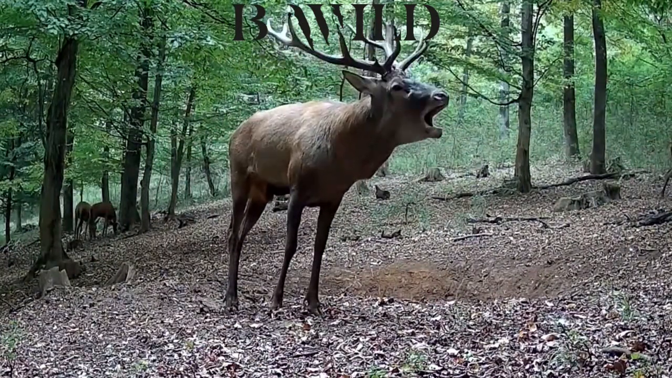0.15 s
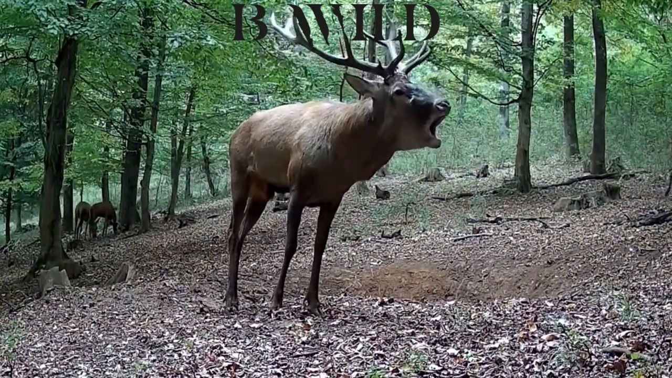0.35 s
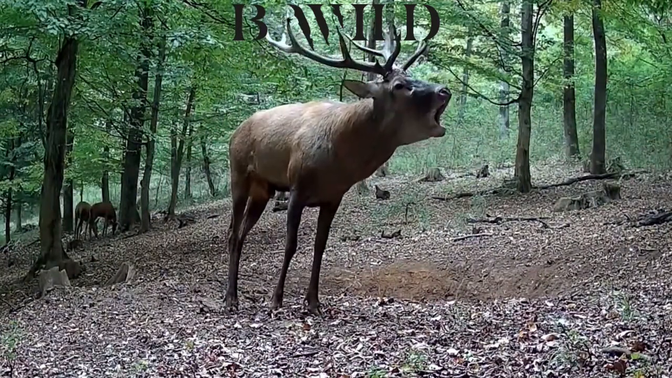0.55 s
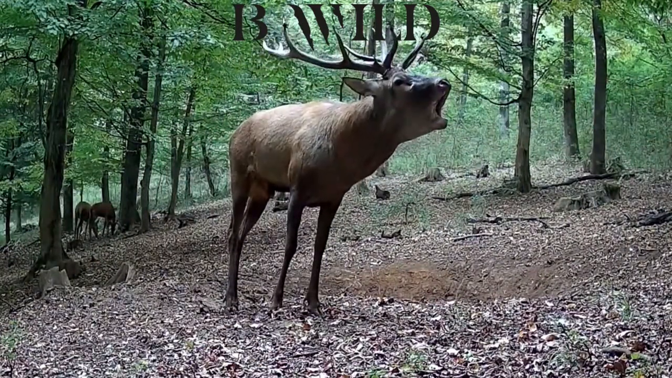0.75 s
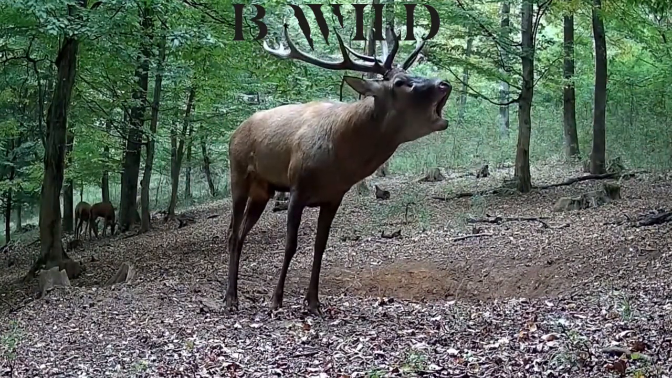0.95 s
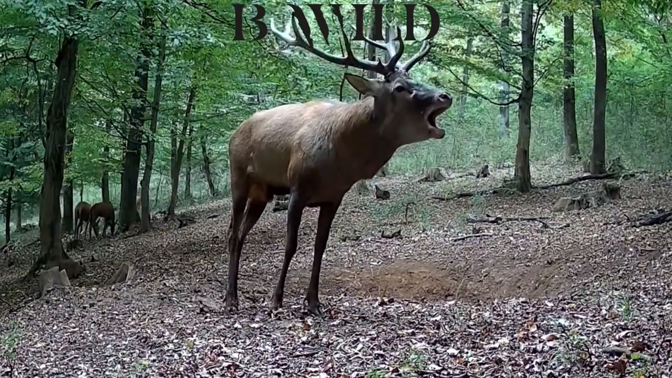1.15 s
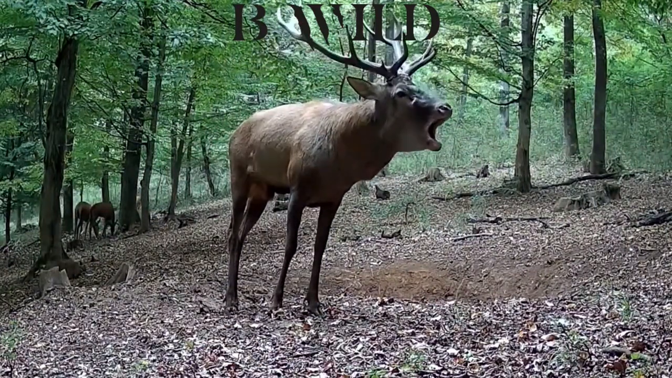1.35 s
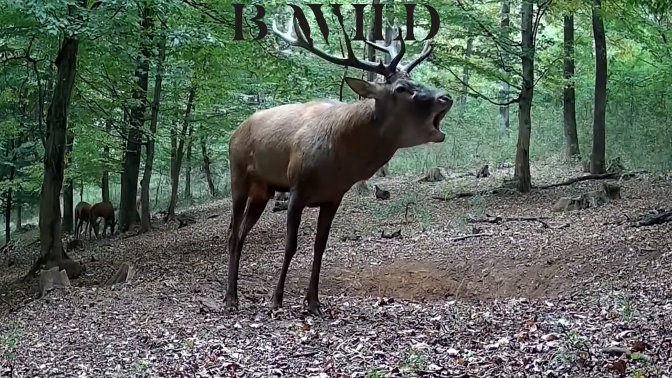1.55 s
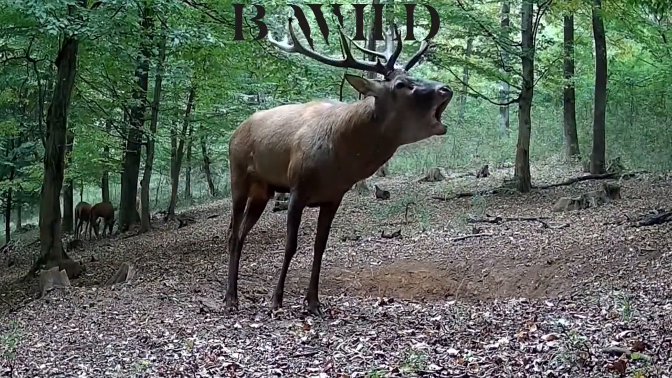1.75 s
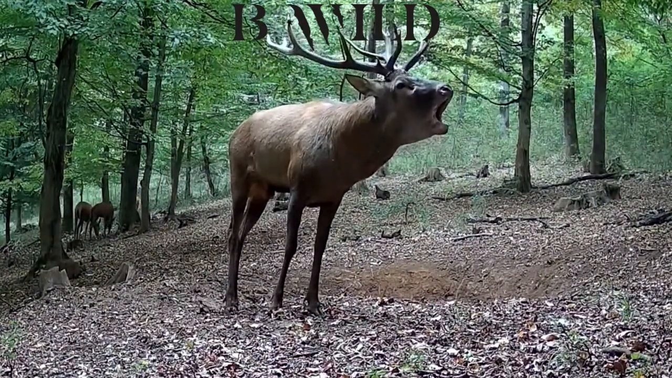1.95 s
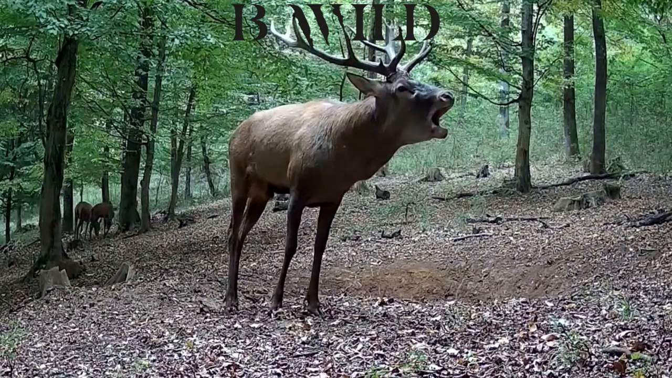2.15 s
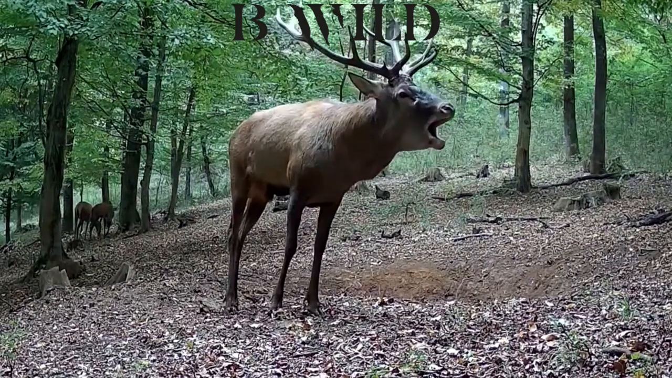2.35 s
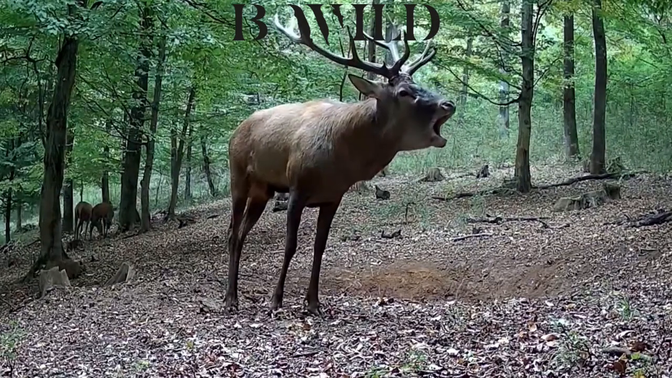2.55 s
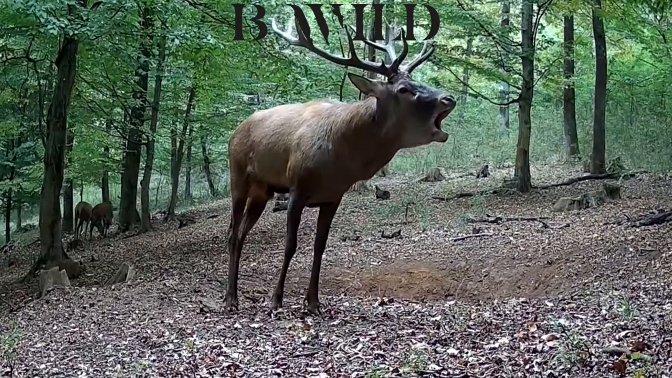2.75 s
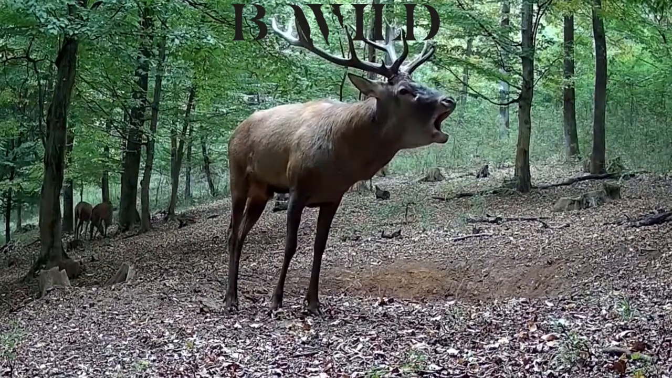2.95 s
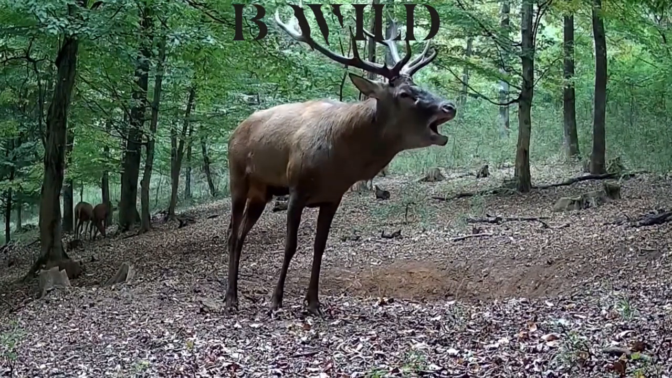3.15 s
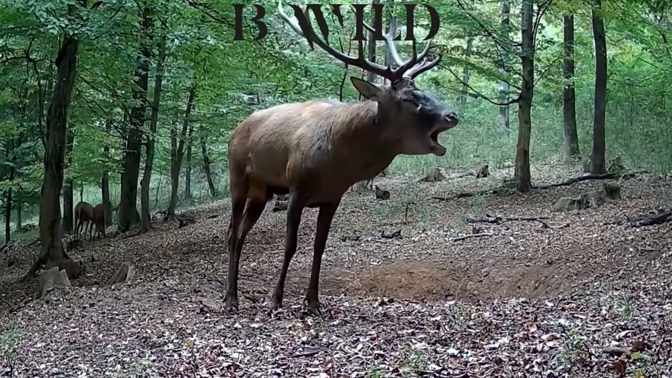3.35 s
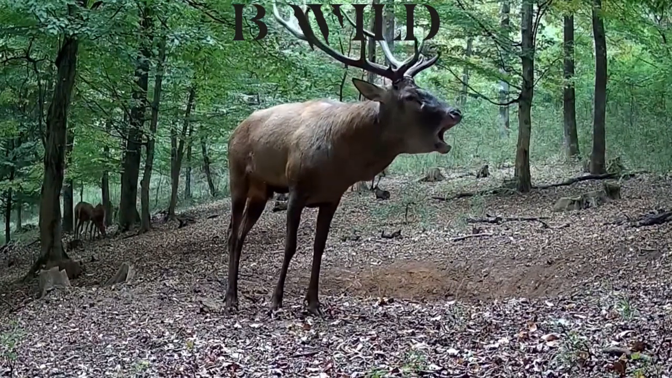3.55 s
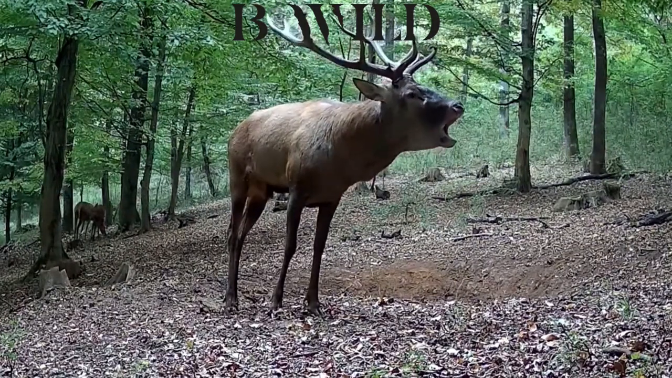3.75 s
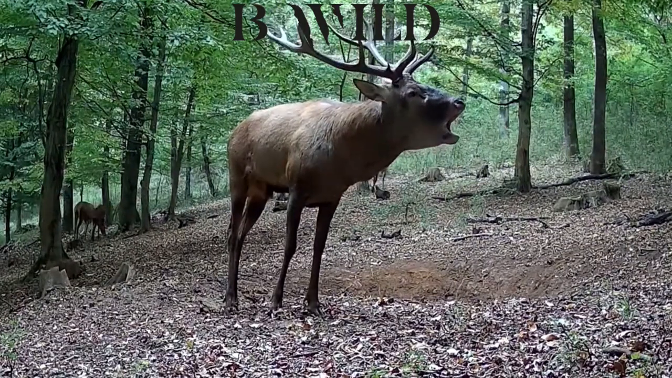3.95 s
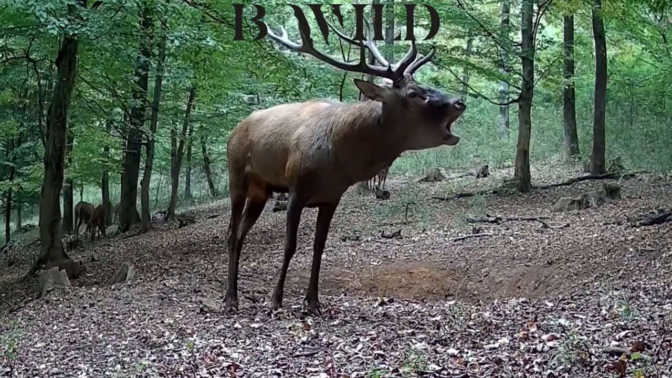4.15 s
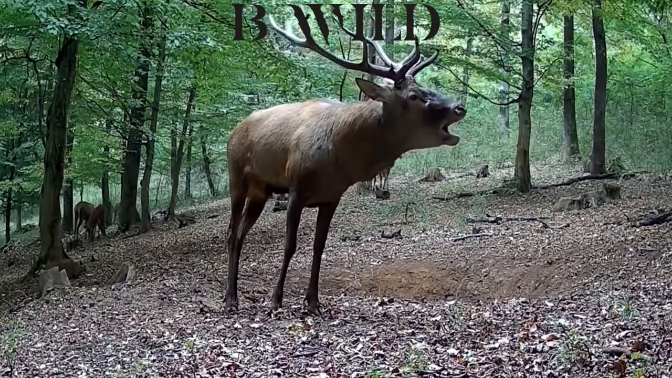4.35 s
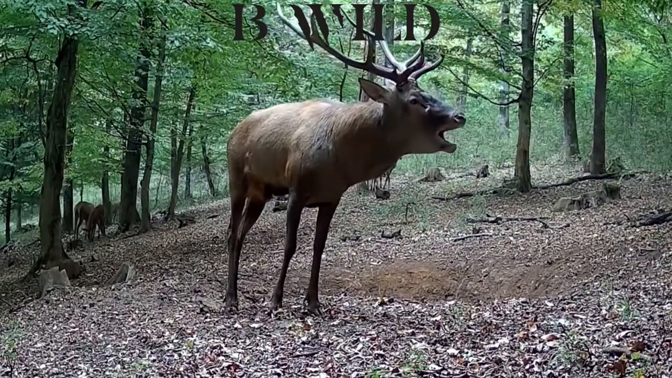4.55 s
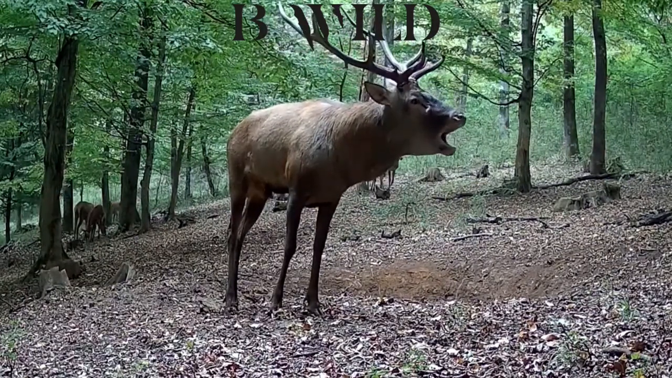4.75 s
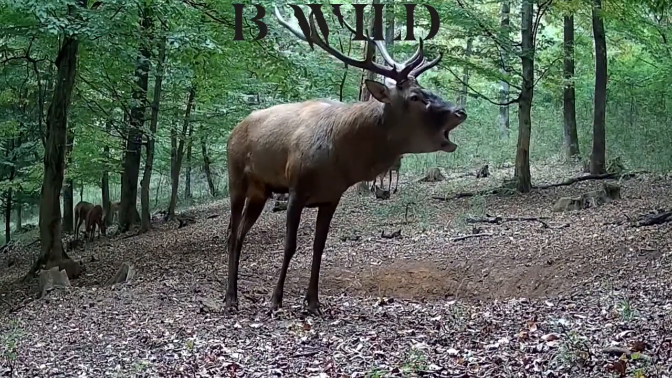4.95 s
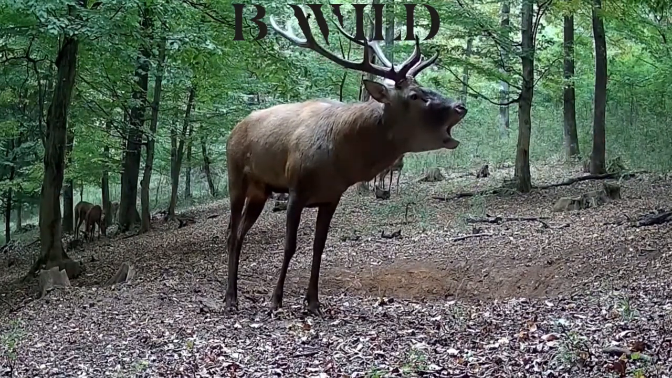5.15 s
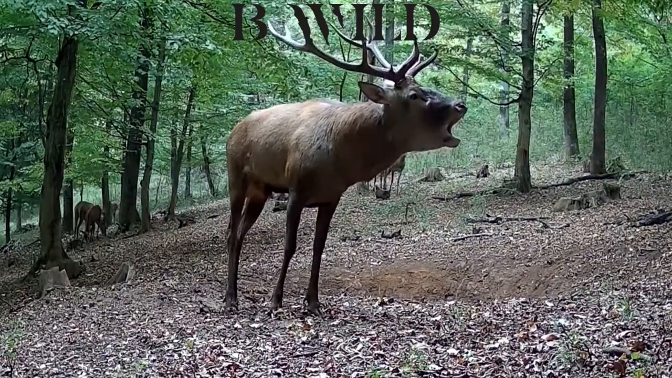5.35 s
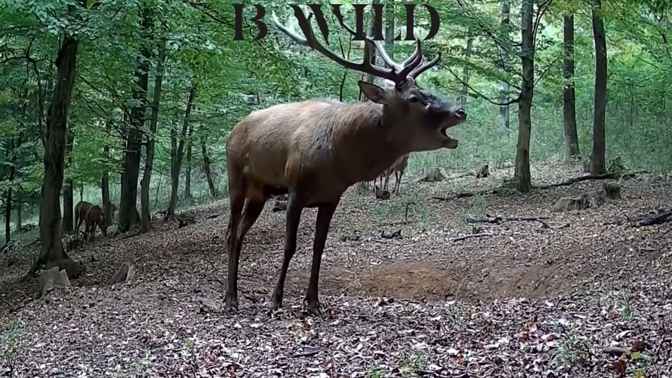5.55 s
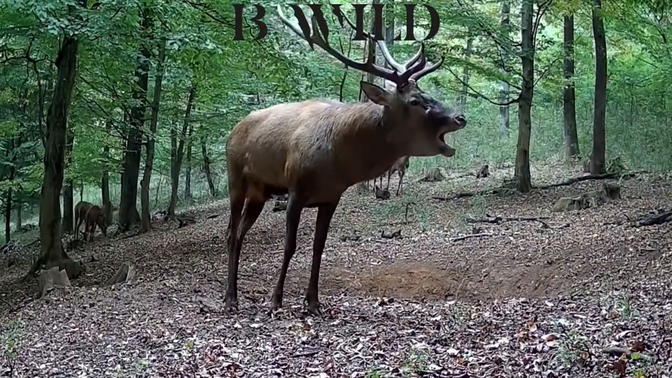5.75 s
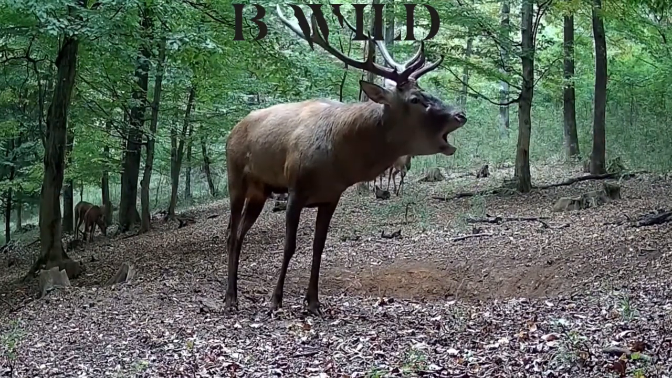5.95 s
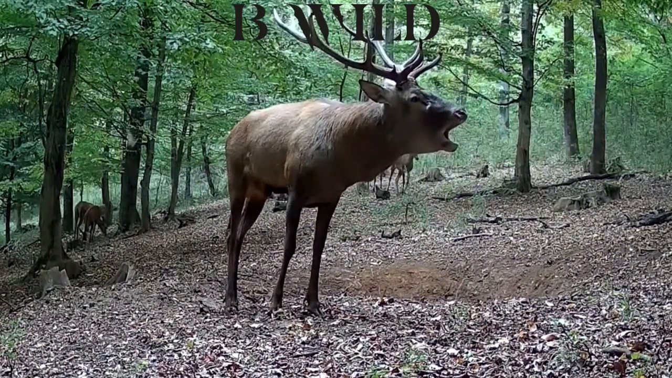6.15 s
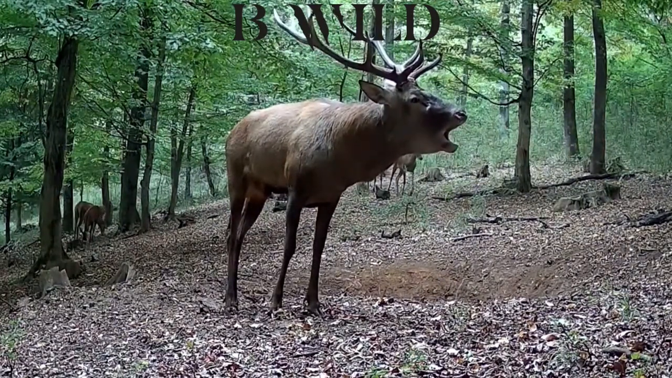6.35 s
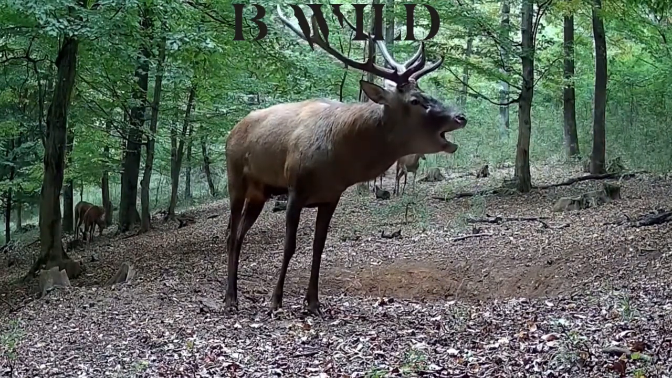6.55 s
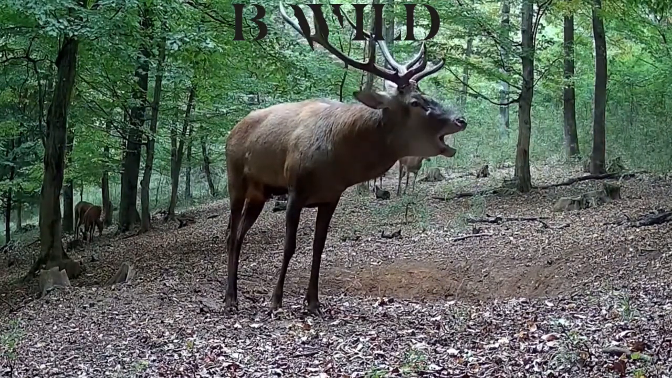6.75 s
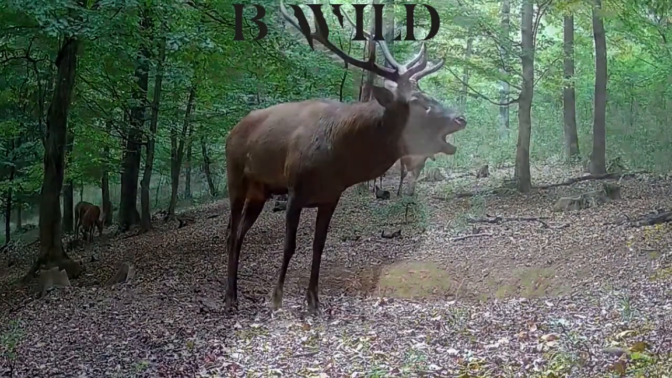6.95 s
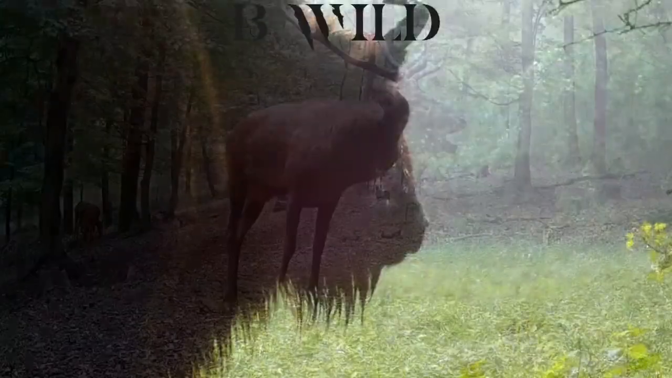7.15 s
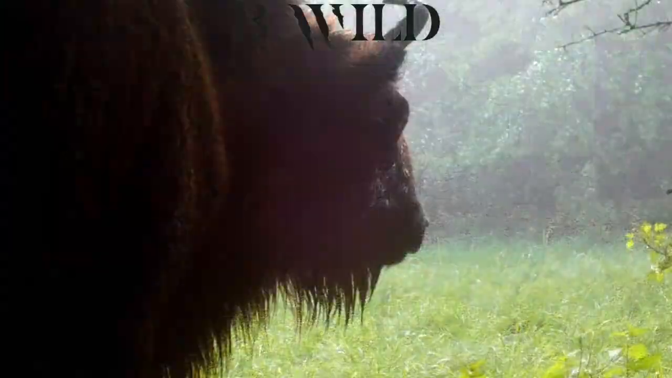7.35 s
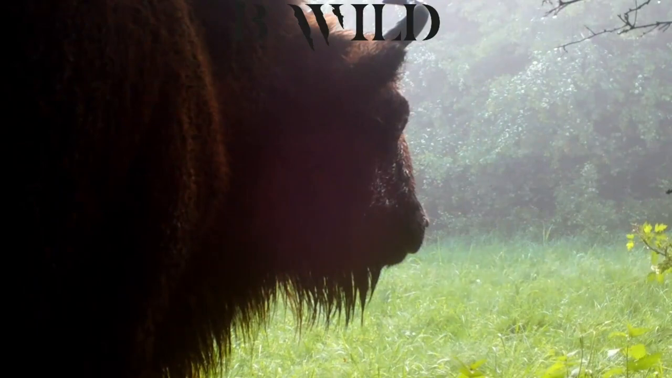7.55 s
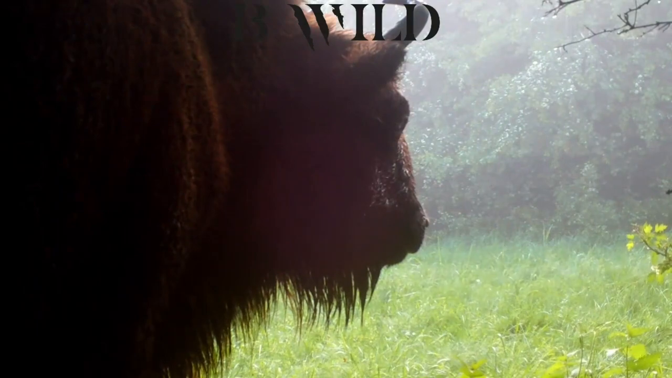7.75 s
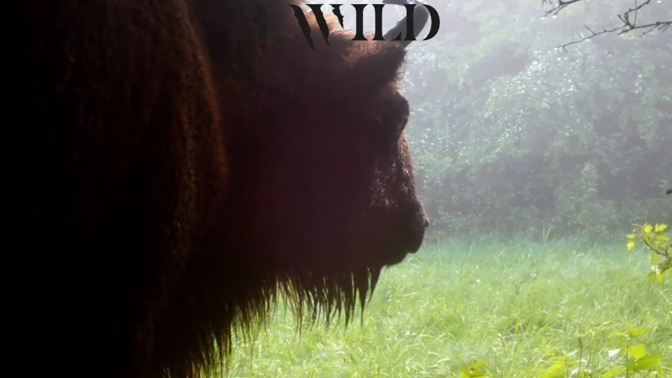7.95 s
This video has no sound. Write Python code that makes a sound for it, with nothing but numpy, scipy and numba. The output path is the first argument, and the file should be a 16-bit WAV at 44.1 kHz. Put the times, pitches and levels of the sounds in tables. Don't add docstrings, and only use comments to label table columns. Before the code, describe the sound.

A red deer stag close by bellows six hoarse, guttural roars in woodland, gradually weakening to a faint creak, then hissing meadow air with bird whistles.

```python
import sys
import numpy as np
from scipy import signal
from scipy.fft import rfft, irfft, next_fast_len
from scipy.io import wavfile
from scipy.ndimage import uniform_filter1d, minimum_filter1d, map_coordinates
from numba import njit

SR = 44100
rng = np.random.default_rng(int(sys.argv[2]) if len(sys.argv) > 2 else 0)


def waveform_to_disk(signal):
    frames = np.transpose(np.atleast_2d(signal))
    scaled = np.clip(frames, -1, 1) * 32767
    samples = np.round(scaled).astype(np.int16)
    wavfile.write(sys.argv[1], SR, samples)


def rack_gain(trim_db):
    fader = np.asarray(trim_db, float)
    return 10 ** (fader / 20)


N = 356769
STEP = 32

# time_s, pulse_rate_hz, effort_db, mouth_opening_db
TAIL = [(0.0, 56, -24, -0.5), (0.082, 51.5, -52, -17), (0.1, 51.7, -49, -13.5)]
FIRST = [(0.289, 83, -60, -7), (0.362, 101.3, -22.5, -10.5), (0.4, 107.8, -20, -1), (0.5, 115.6, -5, -11),
         (0.566, 120.4, -11, -8), (0.874, 115.5, -8, -13), (0.949, 107.8, -10.5, -7.5),
         (1.002, 86.42, -14, -10), (1.07, 52.6, -47.5, -3)]
SECOND = [(1.312, 74.74, -60, -8), (1.372, 100.8, -22, -7.5), (1.492, 106.5, -14, 2.5),
          (1.596, 105.7, -14.5, -2), (1.705, 90.9, -11, -4), (1.958, 87.93, -7.5, -12.5),
          (2.026, 82.26, -14, -5.5), (2.07, 66.24, -14, -6.5), (2.159, 48.56, -57, 0.5)]
THIRD = [(2.39, 74.03, -51.5, -6.5), (2.494, 95.04, -25, 3), (2.604, 99.74, -14.5, -5),
         (2.699, 88.7, -17, 0), (2.8, 73.97, -19.5, 0), (2.954, 64.43, -18.5, 0.5), (3.0, 56.18, -14.5, -4),
         (3.044, 49.2, -39, 8), (3.12, 43.23, -51, -14)]
FOURTH = [(3.37, 66.4, -53.5, -4.5), (3.47, 83.3, -31.5, 0.8), (3.598, 92, -23, -2),
          (3.696, 91.64, -16.5, 2.5), (3.802, 92.43, -4.5, -9.5), (4.041, 81.58, -14.5, 0),
          (4.265, 67.04, -9.5, -13), (4.305, 57.17, -35, 9), (4.4, 41.6, -56.5, -6)]
FIFTH = [(4.66, 66.73, -87, 4), (4.692, 73.5, -51, -1.5), (4.779, 82.28, -39, 1.2),
         (4.902, 87.8, -24.5, -2.5), (4.97, 87.83, -22.5, 3.5), (5.296, 82.68, -16.5, 0.6),
         (5.38, 72.12, -14.5, -5), (5.44, 52, -25.5, -1.5), (5.502, 44.7, -63.5, 6.7)]
SIXTH = [(5.8, 64, -73, 6), (5.842, 67.2, -45.5, -3), (5.936, 83.1, -38, 2), (6.028, 85, -23, -2),
         (6.126, 78.6, -25, 2.5), (6.344, 59.9, -21.5, -2.1), (6.378, 54.77, -23, -2),
         (6.424, 46.28, -37, 4.5), (6.5, 40.95, -56, -17)]
CREAK = [(6.792, 54.6, -65, -2), (6.858, 50.7, -51, -4), (6.93, 45.66, -51.5, -3.5),
         (6.967, 39.5, -56, -4.5), (7.03, 36.16, -66, -0.5)]
ROARS = [
    TAIL,
    FIRST,
    SECOND,
    THIRD,
    FOURTH,
    FIFTH,
    SIXTH,
    CREAK,
]
CLEAR_SNAPS = [0.003, 0.9999, 2.077, 2.998, 4.286, 5.452, 6.392, 6.87]
# relaxed_hz, stretched_hz (resonance near 1270 Hz), stretch_time_s,
# start_gape_0_to_1, end_gape_0_to_1
POSTURE = [(1164, 1300, 0.025, .99, 0.87), (1241.6, 1158, 0.53, 1, 1), (1282, 1165, .52, 0.9, 0.7),
           (1361, 1270, 0.26, .05, .01), (1408, 1222, .55, 0, .7), (1451, 1236, 0.522, .01, 0.3),
           (1441, 1320, 0.48, .01, 0), (1190, 1200, 0.089, 0, .05)]
ROUGHNESS = [(.2, .6), (.12, .55), (.1, .55), (.08, .25), (.08, .35), (.08, .25), (.08, .25), (.03, .02)]
# time_s, added_roughness_0_to_1
CATCHES = [(.43, .05), (.54, .07), (1.65, .12), (4.16, .1), (4.22, .16)]
# snout_db, rasp_db, breath_db
AIM = [(3, -28.5, -37), (-1, -25, -46), (-4.5, -25.5, -47.5), (-7.5, -30, -39.5), (-9.5, -28.5, -42.5),
       (-7.5, -29.5, -39.5), (-11, -31.5, -36.5), (-28, -28, -48)]

# pitch_hz, width_hz, level_db, wide_jaw_gain_db
CHEST = [(186, 37.4, 6, -3.5), (376.8, 23.9, 9.5, -1.5), (516, 57, -9, 1), (580, 17, -9, -15.5)]
# pitch_hz, width_hz, level_db, wide_jaw_gain_db
MOUTH = [(716, 76, -13.5, -9.5), (846, 38, -2, 5), (983.7, 45, 6, -1), (1273.4, 15, 4, 5),
         (1579, 26, -1.5, 1.5)]
# pitch_hz, width_hz, level_db, wide_jaw_gain_db
SNOUT = [(2063, 92, -6, 7), (2385, 41, -10, 15), (2793, 101, 0.5, -2.5), (3137, 50, -2.5, 4.5)]
# pitch_hz, width_hz, level_db, wide_jaw_gain_db
NOSE = [(3652, 90, -3, 7), (4018, 49, 5, 3.5), (4560, 110, -10.5, -0.5), (5070, 78, -11, 1.5),
        (5570, 120, -10.5, -5), (7310, 500, -13.5, 2), (9470, 250, -7, -4.5), (10570, 560, -13, 0),
        (13200, 1200, -27, -0.5)]
# pitch_hz, level_db_per_hz
RASP = [(2940, -36.5), (5000, -22), (5580, 3), (6250, -12.5), (7170, -8.5), (8030, -17.5), (8460, -1),
        (9700, -10.5), (15500, -35.5)]
# pitch_hz, level_db_per_hz
BREATH = [(1500, -43), (2500, -2), (4000, 1.8), (4800, -3), (7000, -1.5), (10000, -6), (12500, -15.5),
          (15500, -35.5)]

# time_s, level_db
SIGHS = [(.03, -48.5), (1.05, -49), (2.129, -53), (3.092, -55), (4.37, -53), (5.5, -47), (6.46, -51.5),
         (7.0, -56)]
# pitch_hz, level_db_per_hz
SIGH_AIR = [(15, -28.5), (40, 0.0), (80, 0.5), (140, -12.5), (300, -41.0), (20000, -120)]
# start_s, length_s, start_hz, end_hz, level_db
WHISTLES = [(7.071, 0.031, 2200, 2190, -61), (7.099, 0.024, 2130, 1776, -61.5),
            (7.295, 0.023, 3400, 3230, -40.5), (7.316, .024, 3030, 2740, -40.5),
            (7.347, 0.032, 2550, 2570, -47.5), (7.427, 0.027, 2120, 2180, -44),
            (7.452, 0.031, 2080, 1770, -50), (7.589, 0.0406, 2840, 3090, -41),
            (7.631, 0.0252, 3147, 3490, -34), (7.657, .011, 3230, 3330, -33),
            (7.667, .014, 2996, 2720, -43), (7.729, 0.021, 5620, 5540, -43), (7.751, .02, 5550, 4720, -36),
            (7.772, 0.015, 4690, 4690, -45), (7.868, .011, 4700, 3620, -39.5),
            (7.878, .024, 3473, 3180, -34.5), (7.904, 0.074, 3130, 3053, -44),
            (7.973, .03, 3080, 3395, -40.5), (8.067, .04, 3690, 3537, -36)]
# start_s, peak_db
TWIG = [
    (7.7125, -27),
]
# pitch_hz, level_db_per_hz
TWIG_CRACKLE = [(1500, -70.5), (4500, -8.5), (8000, -2.5), (11000, -11), (16000, -20.5)]

# pitch_hz, t60_s
TREES = [(150, 0.4), (500, 0.2), (1500, 0.28), (4000, 0.37), (12000, 0.05)]
# pitch_hz, t60_s
MEADOW_EDGE = [(2000, 0.478), (6000, 0.88)]
# pitch_hz, level_db_per_hz
WOOD_AIR = [(15, -28), (25, 5), (101, -6), (410, -14.5), (509, -18), (970, -15.5), (2560, -27), (8580, -27),
            (11200, -32.5), (15500, -60.5)]
# pitch_hz, level_db_per_hz
MEADOW_AIR = [(15, -29), (25, 8), (101, 1.5), (253, -6.5), (1580, -12), (2180, -14), (2370, -15),
              (3270, -7), (3640, -16.5), (8390, -16.5), (15600, -23.5)]


def stag():
    rate_hz, effort_db, open_db = curves(np.concatenate(ROARS))
    rate_hz = uniform_filter1d(rate_hz, size=1500)
    stretch, gape, rough, snout_db, rasp_db, breath_db = posture()
    snaps = folds(rate_hz, rough)
    puff_s = .005
    puff = signal.lfilter([1], [1, -np.exp(-1 / (puff_s * SR))], np.abs(snaps)) + .25
    puffed_air = puff * rng.standard_normal(N)

    weak_db, weak_damping = -27, 1.8
    leak = np.clip(75 / rate_hz, 1, 3) ** 0.96
    leak = leak * (1 + weak_damping * np.clip((weak_db - effort_db) / 20, 0, 1))

    bright = scattered(snaps, t60=.05, share=1.3)
    to_chest = snaps + 0.13 * rough * puffed_air
    chest = cavity(to_chest, CHEST, stretch, gape, leak ** .4, lo_hz=95, hi_hz=764, drift=0.48)
    to_mouth = scattered(snaps, t60=.03, share=.4) + (.002 + .05 * rough) * puffed_air
    mouth = cavity(to_mouth, MOUTH, stretch, gape, leak, lo_hz=640, hi_hz=1750, drift=.5)
    to_snout = bright + (.007 + .1 * rough) * puffed_air
    snout = cavity(to_snout, SNOUT, stretch ** .3, gape, leak, lo_hz=1900, hi_hz=3400, drift=1.2)
    to_nose = bright + (.03 + .2 * rough) * puffed_air
    nose = cavity(to_nose, NOSE, stretch ** .1, gape, leak, lo_hz=3400, hi_hz=14500, drift=1)
    rasp = nose + rack_gain(-12) * unit(puff * hiss(RASP))

    voice = chest + rack_gain(open_db) * mouth
    voice = voice + rack_gain(snout_db + 0.88 * open_db) * snout
    voice = voice + rack_gain(rasp_db + 0.91 * open_db) * rasp
    voice = voice + rack_gain(breath_db) * hiss(BREATH)
    return rack_gain(effort_db) * sounding(ROARS, fade_s=0.0065) * voice


def posture():
    t = np.arange(N) / SR
    starts = np.array([r[0][0] for r in ROARS])
    ends = np.array([r[-1][0] for r in ROARS])
    which = np.searchsorted(starts - .05, t) - 1
    since = np.clip(t - starts[which], 0, None)
    left = np.clip(ends[which] - t, 0, None)
    done = since / (since + left)

    rest_hz, spring_back_s, overshoot = 1270, .13, 1.05
    relaxed_hz, stretched_hz, pull_s, first, last = np.transpose(POSTURE)[:, which]
    pulled_hz = relaxed_hz + (stretched_hz - relaxed_hz) * np.clip(since / pull_s, 0, 1)
    let_go = np.clip(1 - left / spring_back_s, 0, 1)
    throat_hz = pulled_hz + (overshoot * relaxed_hz - pulled_hz) * let_go
    gape = np.clip(first + (last - first) * done, 0, 1)

    settle_s, break_s, tiring, catch_s = .07, .13, .04, .03
    onset, ending = np.transpose(ROUGHNESS)[:, which]
    breaking = np.clip(1 - left / break_s, 0, 1) ** .8
    rough = onset * np.exp(-since / settle_s) + ending * breaking + tiring * done ** 2
    rough = rough + sum(r * np.exp(-((t - s) / catch_s) ** 2) for s, r in CATCHES)

    snout_db, rasp_db, breath_db = np.transpose(AIM)[:, which]
    snout_db = snout_db - 9.5 * done - 4.5 * breaking
    snout_db = snout_db - 12.5 * np.exp(-since / .06)
    spent = np.clip(1 - left / 0.17, 0, 1)
    return throat_hz / rest_hz, gape, rough, snout_db, rasp_db + 18 * spent, breath_db + 30 * spent


def folds(rate_hz, rough):
    cycles = np.cumsum(rate_hz) / SR
    for roar, s in zip(ROARS, CLEAR_SNAPS):
        first = max(0, int((roar[0][0] - .05) * SR))
        cycles[first:] += -cycles[int(s * SR)] % 1
    k = np.arange(1, int(cycles[-1]))
    luck = rng.standard_normal((1200, 2))[:len(k)]
    r = rough[np.searchsorted(cycles, k)]
    at = np.interp(k + (.001 + .15 * r) * luck[:, 0], cycles, np.arange(N))
    taps = np.floor(at)[:, None] + np.arange(-7, 9)
    offset = taps - at[:, None]
    shape = np.sinc(offset) * np.cos(np.pi * offset / 16) ** 2
    snaps = shape * rack_gain((.15 + 5 * r) * luck[:, 1])[:, None]
    return np.bincount(np.clip(taps, 0, N - 1).astype(int).ravel(), snaps.ravel(), N)


def scattered(x, t60, share):
    t = np.arange(SR // 20) / SR
    spread = unit(rack_gain(-60 * t / t60) * rng.standard_normal(len(t))) / np.sqrt(len(t))
    return x + share * signal.fftconvolve(x, spread)[:N]


def cavity(x, modes, stretch, gape, leak, lo_hz, hi_hz, drift):
    y = np.zeros(N)
    for k, (hz, width_hz, db, jaw_db) in enumerate(modes):
        keep = np.exp(-np.pi * width_hz * leak[::STEP] / SR)
        turn = 2 * np.pi * hz * stretch[::STEP] * (1 + 0.017 * drift * wobble(5)) / SR
        level = rack_gain(db + gape[::STEP] * jaw_db + 3.3 * drift * wobble(6))
        gain = (-1) ** k * (1 - keep) * level
        y += ring(x, 2 * keep * np.cos(turn), keep, gain, STEP)
    y = signal.sosfilt(signal.butter(2, [lo_hz, hi_hz], "band", fs=SR, output="sos"), y)
    power = uniform_filter1d(uniform_filter1d(y * y, size=2400), size=2400)
    return y / np.sqrt(np.abs(power) + 1e-12)


@njit
def ring(x, pull, keep, gain, step):
    y = np.zeros(len(x))
    for i in range(2, len(x)):
        j = i // step
        y[i] = gain[j] * (x[i] - x[i - 2]) + pull[j] * y[i - 1] - keep[j] * keep[j] * y[i - 2]
    return y


def wobble(rate):
    return map_coordinates(rng.standard_normal(200), [np.arange(0, N, STEP) * rate / SR])


def sighs():
    t = np.arange(N) / SR
    sigh_s = .04
    swell = sum(rack_gain(db) * np.exp(-((t - s) / sigh_s) ** 2) for s, db in SIGHS)
    flow = uniform_filter1d(sounding(ROARS[:-1], fade_s=0.0036), size=3000)
    late_flow = np.pad(uniform_filter1d(flow, size=12000), (7000, 0))[:N]
    swell = swell + rack_gain(-45.5) * flow * late_flow
    return swell * hiss(SIGH_AIR)


def bird():
    song, t = np.zeros(N), np.arange(N) / SR
    attack_s, release_s, swell_db_per_octave = 0.0104, 0.0037, 19
    for s, length, start_hz, end_hz, db in WHISTLES:
        u = np.clip((t - s) / length, 0, 1)
        rise = np.clip((t - s) / min(attack_s, length / 2), 0, 1)
        fall = np.clip((s + length - t) / release_s + 1, 0, 1)
        swell_db = swell_db_per_octave * np.log2(end_hz / start_hz) * (u - .5)
        hz = start_hz + (end_hz - start_hz) * u
        tone = np.sin(2 * np.pi * np.cumsum(hz) / SR)
        song += np.sqrt(2) * rack_gain(db + swell_db) * (rise * fall) ** 2 * tone
    return song


def twig():
    t = np.arange(N) / SR
    burst = sum(rack_gain(db - 3) * (t > s) * np.exp(-np.abs(t - s) / 0.001) for s, db in TWIG)
    return burst * hiss(TWIG_CRACKLE)


def echoes(x, t60s, gap):
    hz, t, z = signal.stft(rng.standard_normal(SR), SR, nperseg=256)
    tail = signal.istft(z * rack_gain(-60 * t / along(t60s, hz)[:, None]), SR, nperseg=256)[1]
    delayed = np.pad(x, (int(gap * SR), 0))
    return signal.fftconvolve(delayed, tail / np.linalg.norm(tail))[:N]


def air():
    t = np.arange(N) / SR
    fade_at_s, fade_s = 6.995, .6
    fade = np.clip((t - fade_at_s) / fade_s, 0, 1)
    wood = rack_gain(-58.5 - 0.8 * t) * (1 - fade) ** 3 * hiss(WOOD_AIR)
    meadow = rack_gain(-47) * fade * hiss(MEADOW_AIR)
    return wood + meadow


def hiss(spectrum):
    return unit(filtered(rng.standard_normal(N), lambda hz: rack_gain(along(spectrum, hz))))


def filtered(x, response):
    m = next_fast_len(N + SR // 2)
    return irfft(rfft(x, m) * response(np.fft.rfftfreq(m, 1 / SR)), m)[:N]


def unit(x):
    return x / np.sqrt(np.mean(x ** 2) + 1e-20)


def along(points, hz):
    f, v = np.transpose(points)
    return np.interp(np.log(hz + 1), np.log(f + 1), v)


def curves(rows):
    s, *cols = np.transpose(rows)
    return [np.interp(np.arange(N) / SR, s, c) for c in cols]


def sounding(tables, fade_s):
    t = np.arange(N) / SR
    total = np.zeros(N)
    for rows in tables:
        inside = np.minimum(t - rows[0][0], rows[-1][0] - t)
        total += np.clip((inside + fade_s) / fade_s, 0, 1)
    return total.clip(0, 1)


def scene():
    roar, song = stag(), bird()
    wood = roar + rack_gain(-17) * echoes(roar, TREES, gap=.02)
    meadow = rack_gain(5.0) * song + rack_gain(1) * echoes(song, MEADOW_EDGE, gap=0.0092)
    return (wood + meadow + sighs() + twig() + air())[None]


def band_limit(x):
    return signal.sosfilt(signal.butter(12, 15730, fs=SR, output="sos"), x)


def record(dry):
    x = filtered(dry[0], lambda hz: (1j * hz / (1j * hz + 60)) ** 2 * (hz < 15730))
    need = minimum_filter1d(np.minimum(1, 1.03 / (np.abs(x) + 1e-9)), size=441)
    x = x * uniform_filter1d(need, size=441)
    x = x / (1 + np.abs(x / .99) ** 30) ** (1 / 30)
    return band_limit(x[None])


dry = scene()
out = record(dry)
waveform_to_disk(out)
```